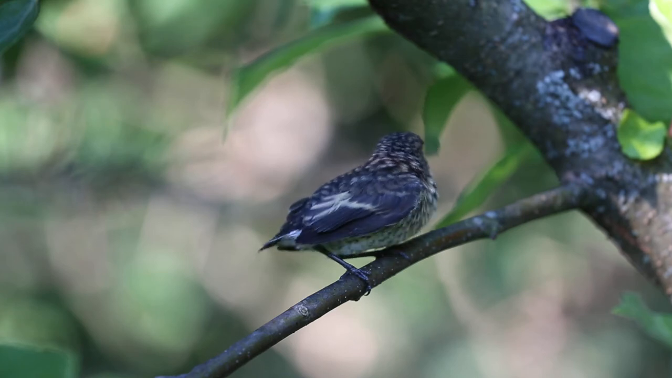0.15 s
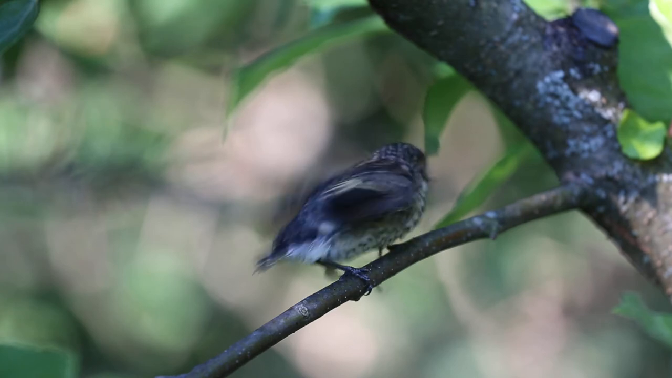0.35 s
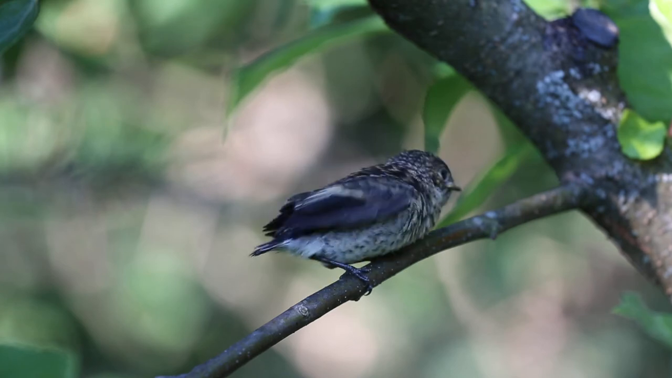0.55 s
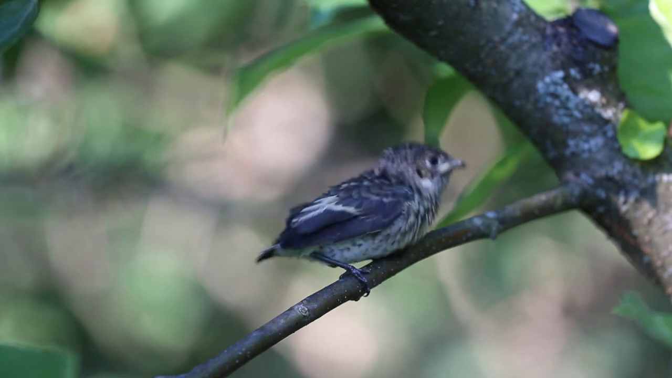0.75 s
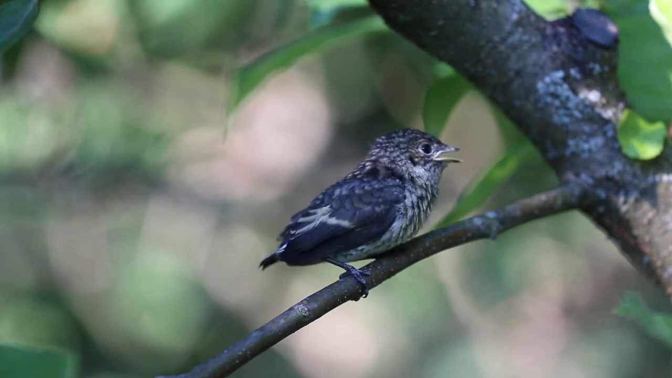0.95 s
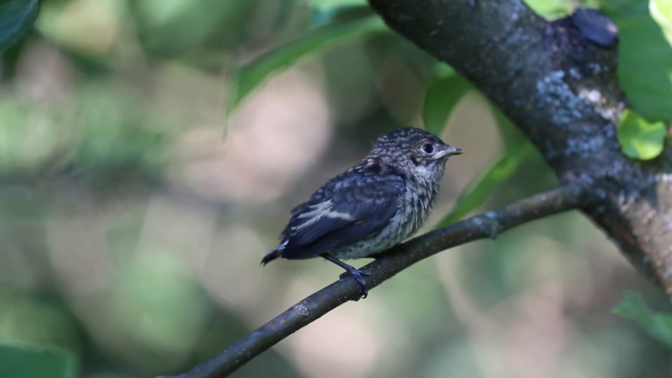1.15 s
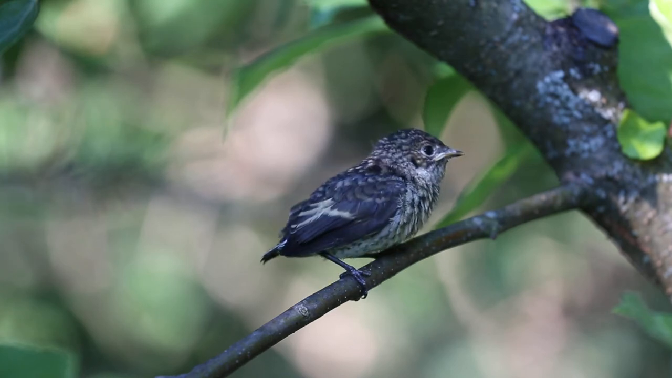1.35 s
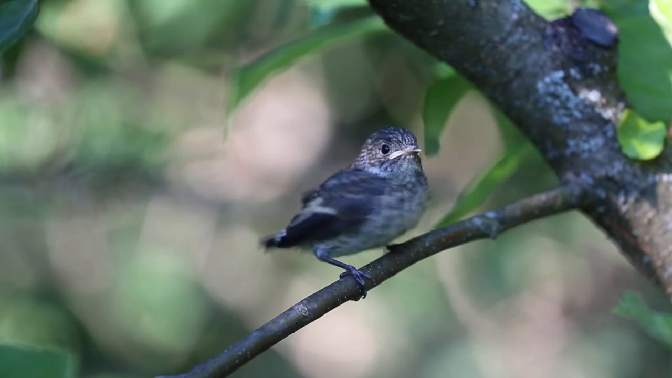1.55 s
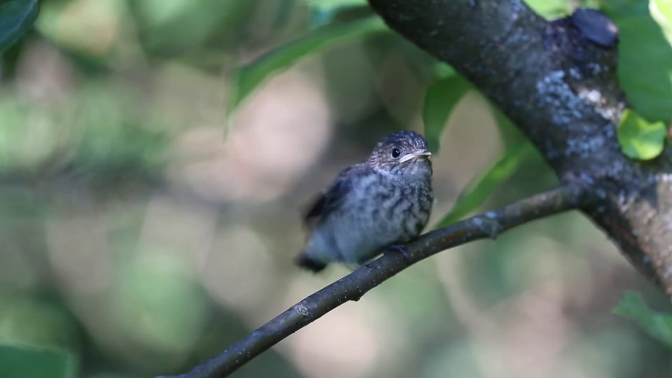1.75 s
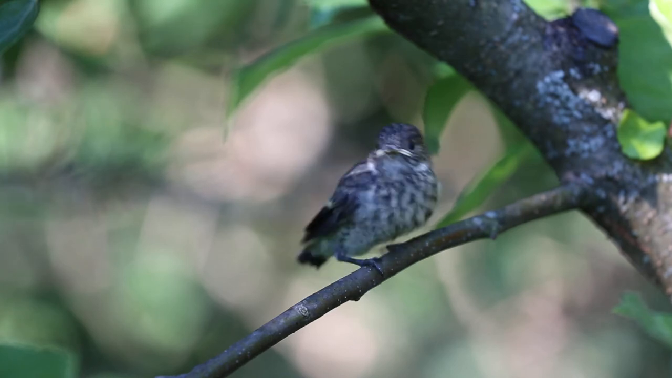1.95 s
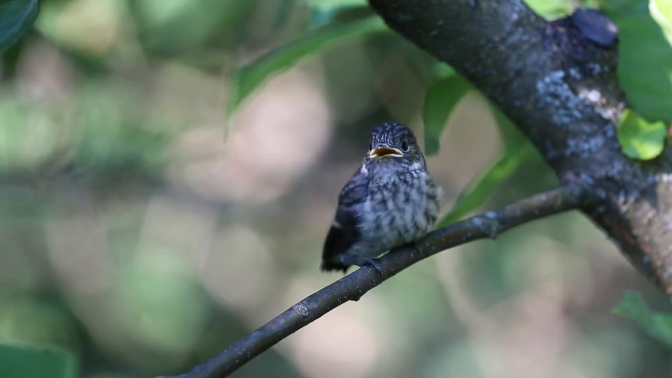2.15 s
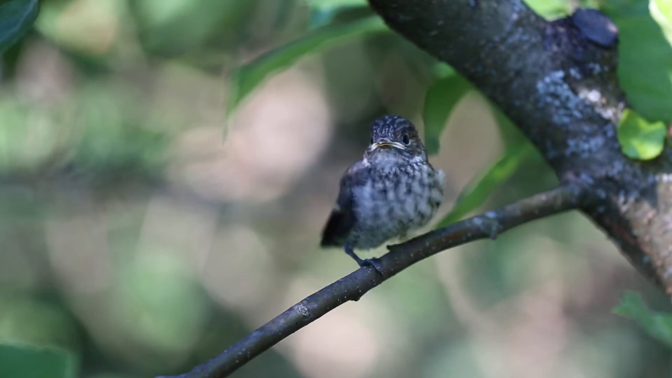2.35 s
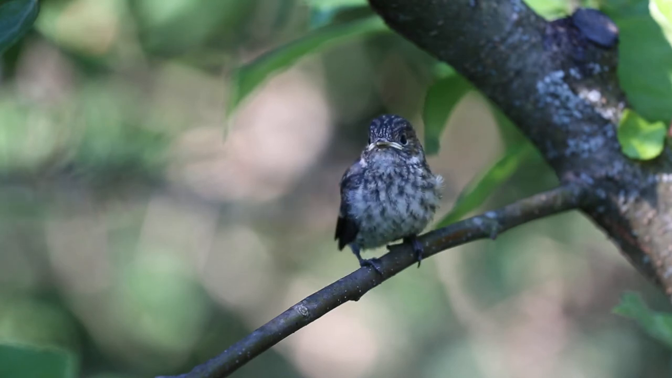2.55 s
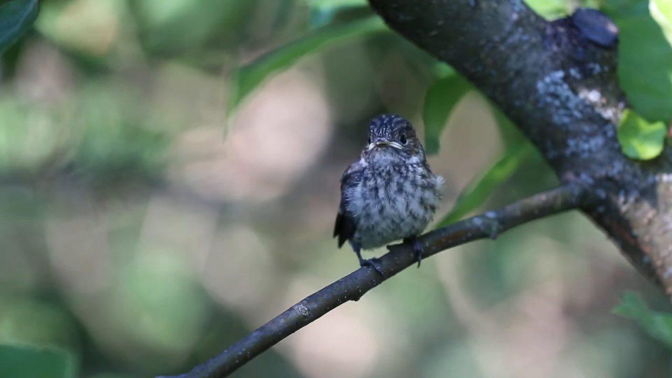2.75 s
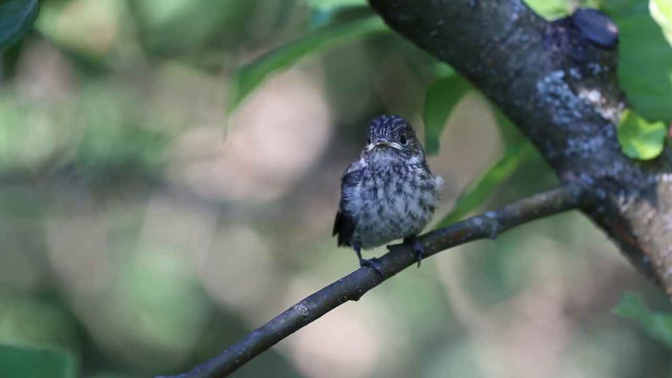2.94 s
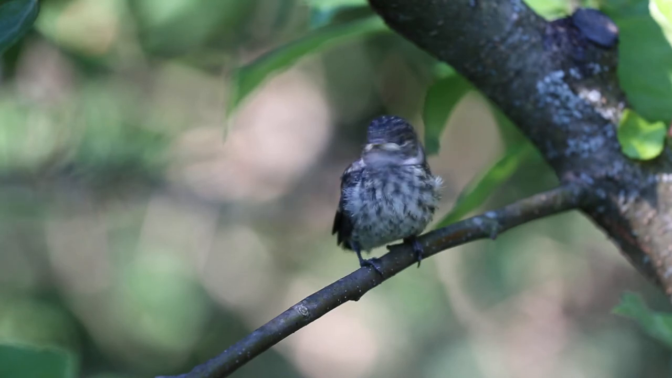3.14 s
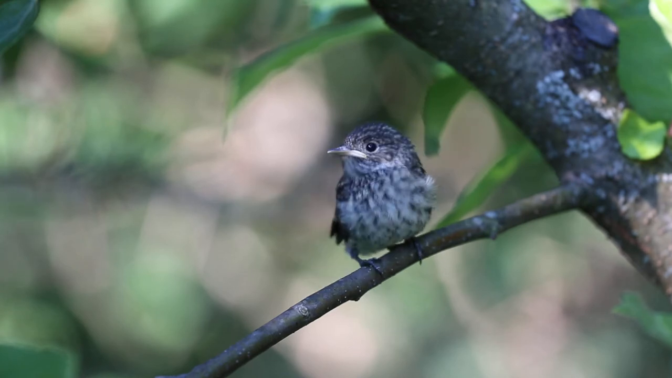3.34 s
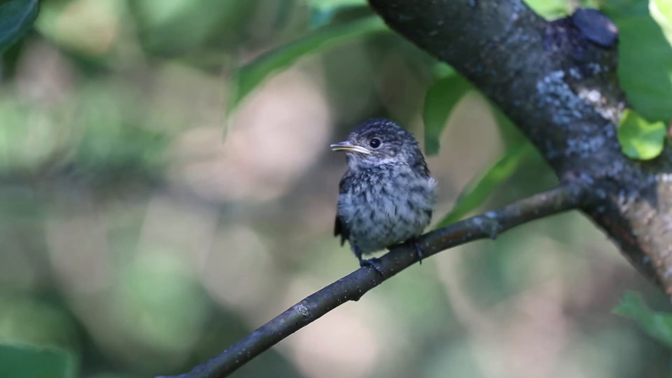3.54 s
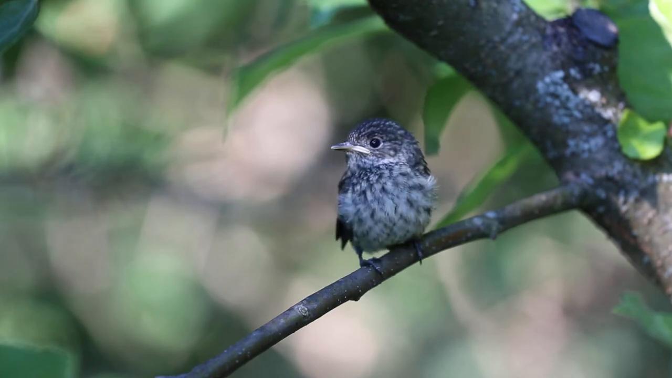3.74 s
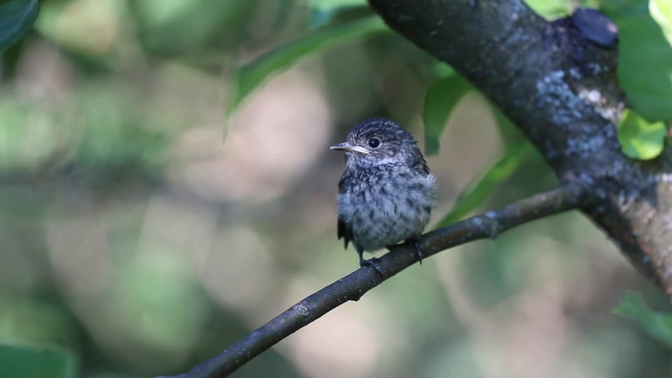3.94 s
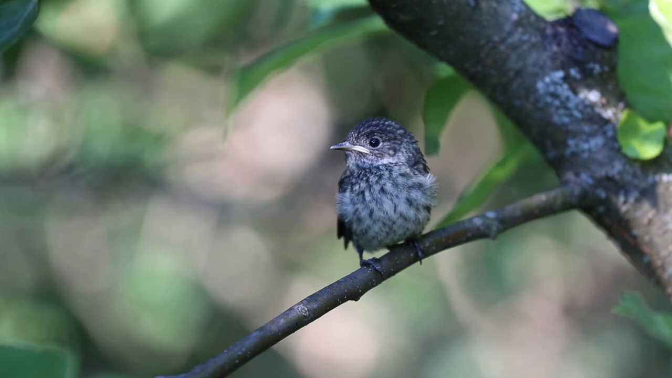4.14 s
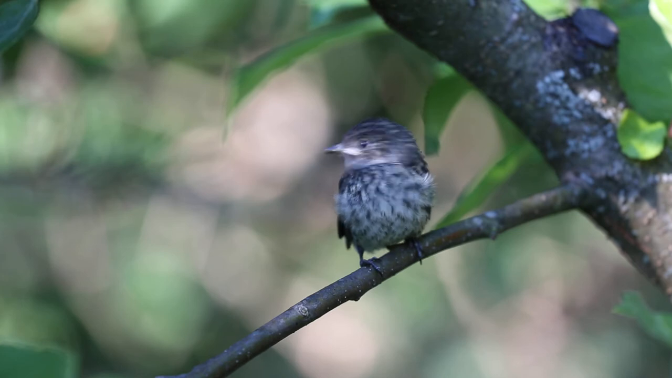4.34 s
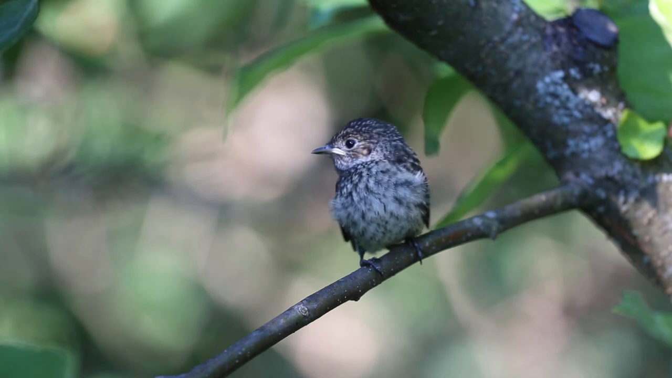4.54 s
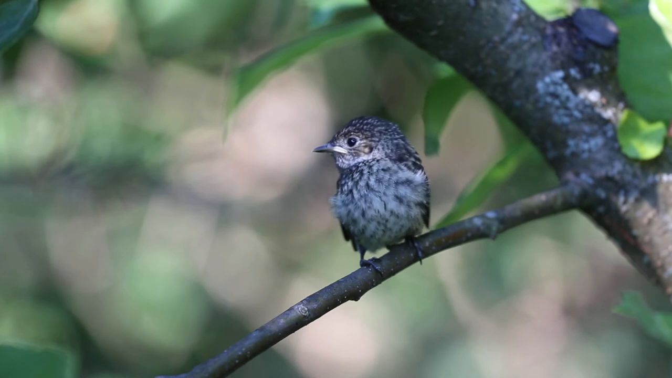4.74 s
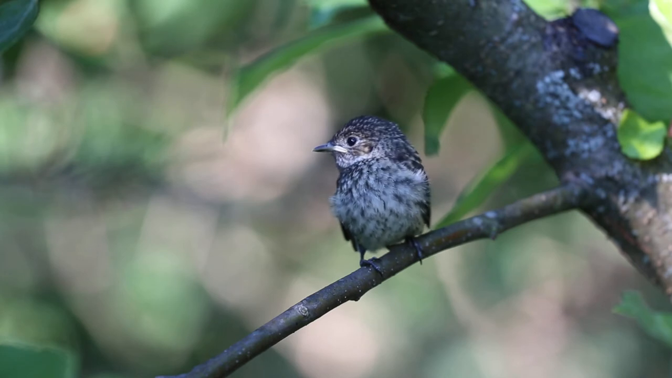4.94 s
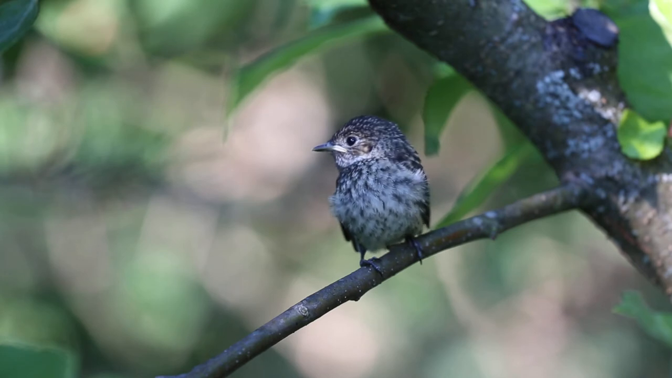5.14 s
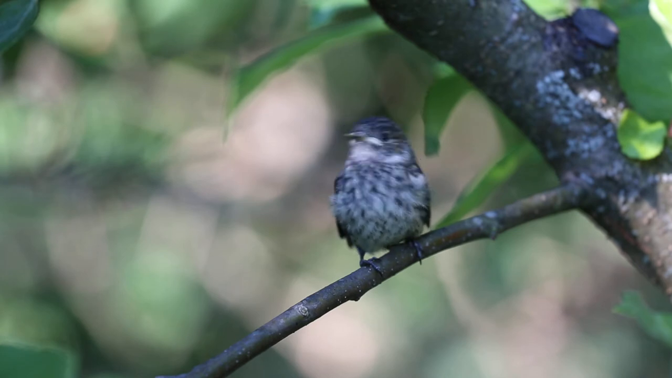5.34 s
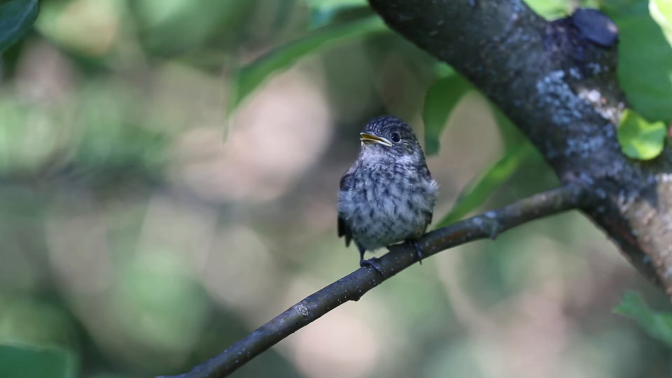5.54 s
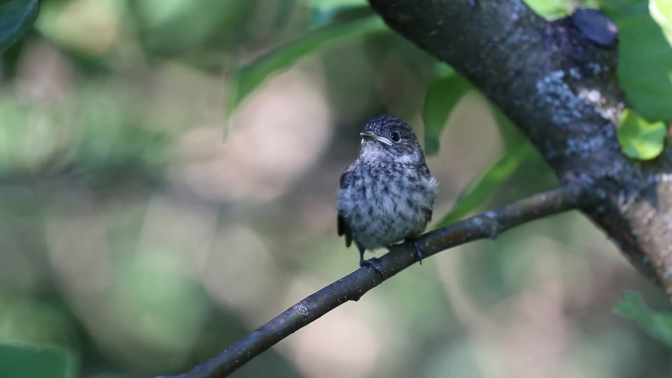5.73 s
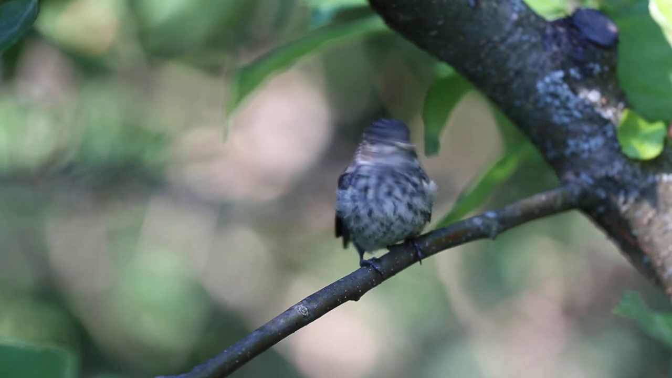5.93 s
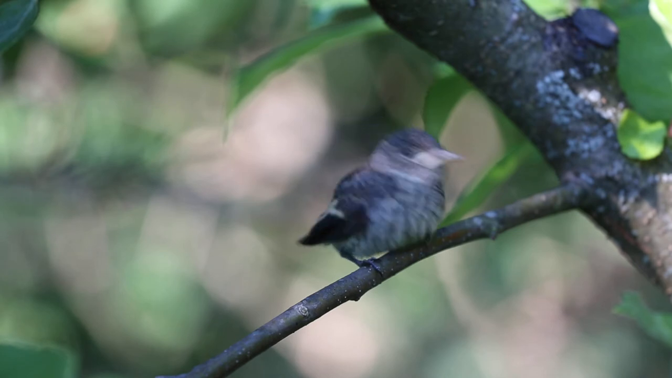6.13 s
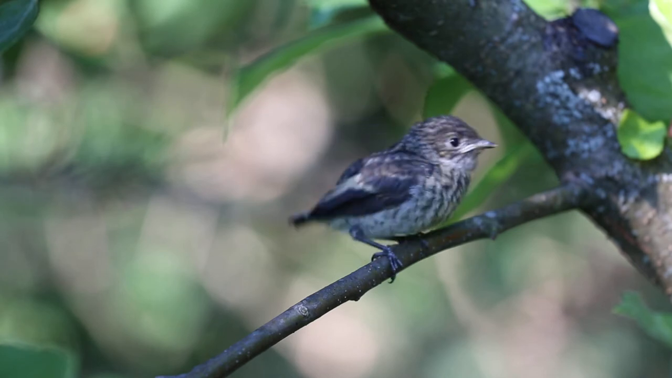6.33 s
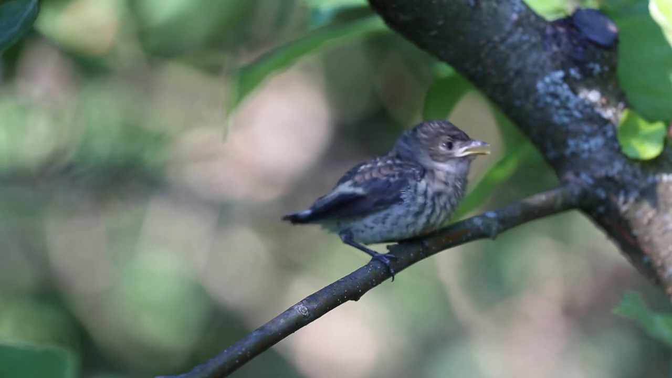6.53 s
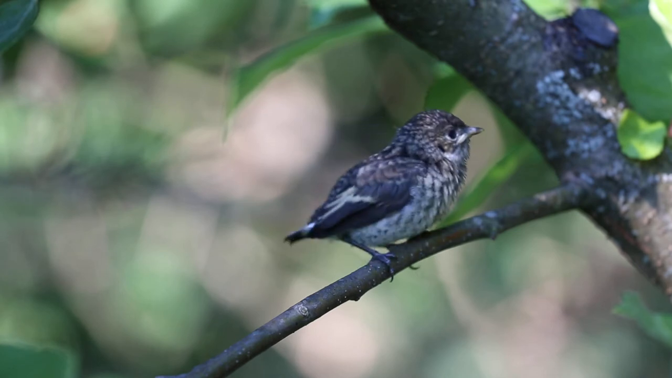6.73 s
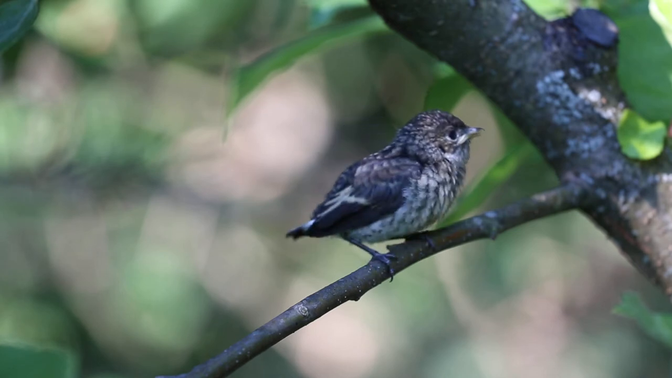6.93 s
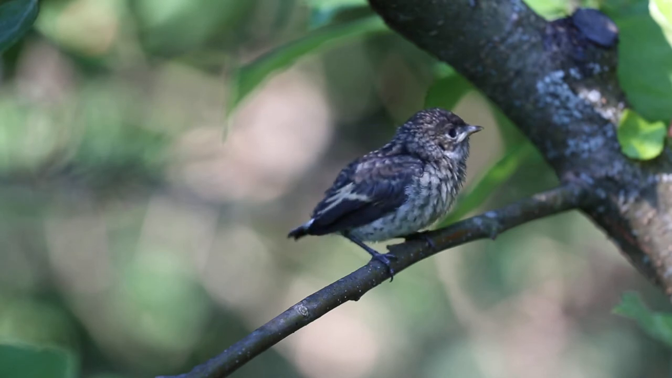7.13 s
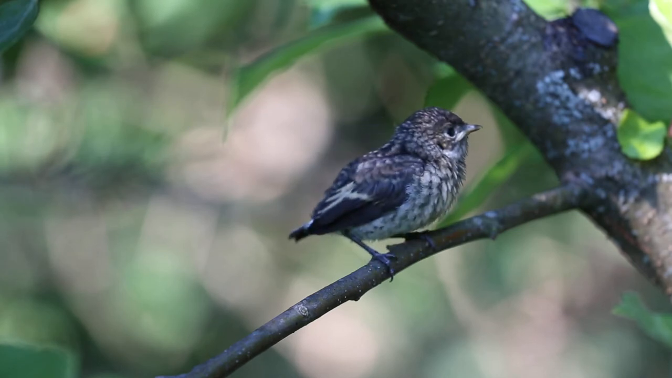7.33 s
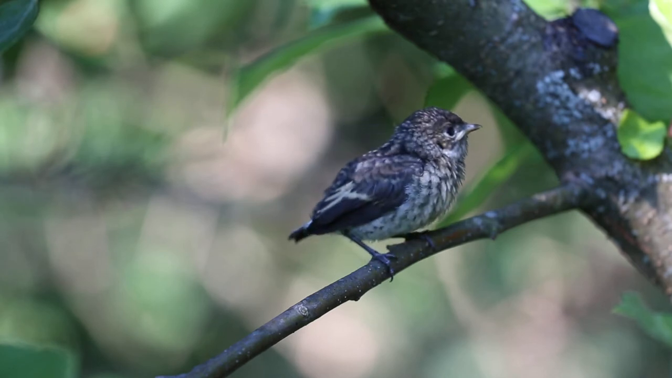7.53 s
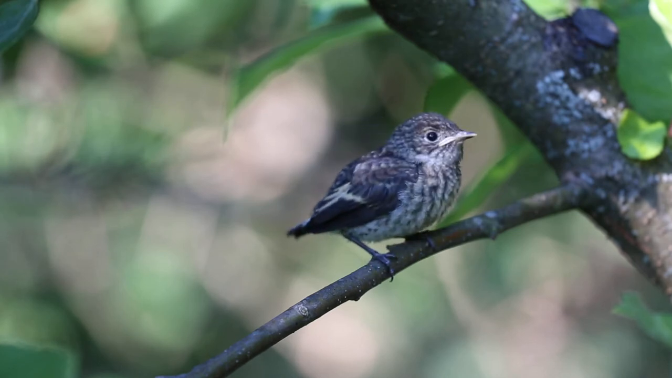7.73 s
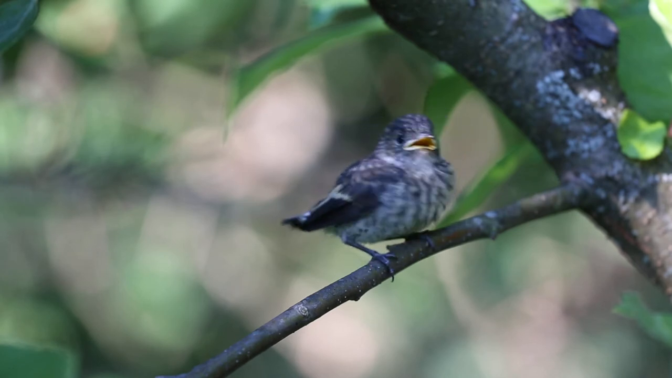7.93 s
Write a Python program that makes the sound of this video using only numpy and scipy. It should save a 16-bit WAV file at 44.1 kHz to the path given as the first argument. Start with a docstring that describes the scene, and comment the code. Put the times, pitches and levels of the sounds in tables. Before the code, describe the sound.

Thin, shrill cheeps from a nearby young songbird repeat every second or two, with distant birds and softly rushing air.

```python
"""In a wood, a young bird on a branch begs six times. Each call is two high, warbling voices,
one from each side of its voice box (the syrinx). Its wings flick just before the last call.
Other birds sing, chip and call further off, and once a distant piece of metal scrapes and rings.
Leaves and trunks send back echoes. Under it all lie a soft rush of air and a faint hum."""
import sys
import numpy as np
from scipy import signal
from scipy.fft import rfft, irfft, next_fast_len
from scipy.io import wavfile

SR = 44100
rng = np.random.default_rng(int(sys.argv[2]) if len(sys.argv) > 2 else 0)


def master(y):
    """Save y as 16-bit WAV."""
    cut = np.clip(np.atleast_2d(y).T, -1, 1)
    pcm = np.round(cut * 32767)  # scale
    wavfile.write(sys.argv[1], SR, pcm.astype(np.int16))


N = 355446
TIME = np.arange(N) / SR

# tone of the rushing air: f/Hz, relative level/dB
AIR_TONE = [(15, -47), (25, -11), (99, -6), (129, -9), (193, -2), (274, -7.5), (389, -1.5), (433, -6),
            (871, -8), (2420, -15.5), (3000, -15.5), (4500, -16), (5280, -17.5), (8580, -20),
            (15500, -26.5)]
# gusts of breeze: peak t/s, half length/s, rise/dB
BREEZE_GUSTS = [(1.3, 0.43, 2.2), (5.908, 0.26, 4.5), (6.76, 0.096, 4.5)]
# how the hum sinks and grows: t/s, relative level/dB
HUM_LEVELS = [(0, -67), (1, -74), (3.8, -71), (5.0, -62), (8.05, -59)]
# far bird calls, blurred by the trees, and at 4.26 s a low blurred echo of the song: t/s, length/s, f/Hz,
# width/Hz, level/dB
DISTANT_CALLS = [(.0, 0.26, 4160, 220, -57), (.11, 0.22, 8250, 700, -56), (4.06, 0.27, 7480, 650, -51.5),
                 (4.26, 0.12, 2280, 354, -57), (4.36, 0.2, 8900, 550, -55), (5.735, .058, 4270, 170, -49),
                 (5.74, 0.32, 4255, 131, -60), (6.78, 0.52, 3730, 400, -59.5),
                 (7.05, .99, 3450, 1350, -55.5), (7.45, 0.99, 4780, 810, -52.5),
                 (7.82, 0.29, 3700, 970, -49)]
# the songbird's clearest notes: t/s, length/s, slide name, f/Hz near the note's top, level/dB
SONG_NOTES = [(0.153, 0.049, "dive", 3160, -54), (1.677, 0.014, "rise", 6300, -51),
              (1.726, 0.047, "arch", 5800, -47), (1.859, 0.025, "flat", 5600, -49.5),
              (1.96, 0.041, "arch", 5800, -46), (2.053, 0.058, "droop", 4620, -51),
              (2.242, 0.035, "rise", 5650, -45.5), (2.34, 0.038, "rise", 5800, -44),
              (2.425, .014, "flat", 5600, -41), (2.509, 0.064, "droop", 4450, -51),
              (2.633, 0.037, "rise", 5840, -42), (2.666, .016, "fall", 5700, -44),
              (2.752, 0.065, "droop", 4720, -52.5), (2.875, 0.04, "flat", 5750, -47.5),
              (2.938, .024, "flat", 6450, -50), (3.003, .036, "fall", 3900, -54.5),
              (3.056, .018, "droop", 6220, -52), (3.08, 0.024, "fall", 5320, -47),
              (3.133, .038, "arch", 5750, -46.5), (3.169, .025, "fall", 4200, -50),
              (3.219, 0.0283, "fall", 3560, -50), (3.24, 0.072, "flat", 4250, -53.5),
              (3.37, .049, "rise", 3900, -55), (3.442, 0.035, "rise", 3200, -53.5),
              (3.573, 0.045, "arch", 3820, -51.5), (3.681, 0.016, "flat", 4300, -47.5),
              (3.772, 0.04, "arch", 3580, -51)]
# pitch slides by name: start, middle and end as shares of the note's f
SLIDES = {"rise": (.79, .93, 1), "arch": (.83, 0.97, .77), "fall": (0.98, .88, 0.787),
          "droop": (0.97, 0.94, .82), "flat": (0.96, 1, 0.94), "dive": (1, .83, 0.682)}
# a bird that chips in pairs: t/s, level/dB
CHIP_PAIRS = [(0.343, -59), (.777, -60.5), (4.525, -60), (4.757, -57), (5.183, -57), (6.508, -57.5),
              (6.989, -58), (7.457, -57.5), (7.857, -58)]
# overtones of a chip: multiple of the pitch, relative level/dB
CHIP_OVERTONES = [(2, 5), (3, 4.5), (4, -1.5), (5, -9.5)]
# begging calls, before the throat shapes them: t/s, length/s, starting warble length/s,
# slowing/(s per warble squared), low voice f/Hz, high voice f/Hz, low level/dB, high level/dB,
# low voice's peak as a share of the length, octave gain/dB, gain into the wood/dB
BEGGING_CALLS = [(0.9112, 0.18, 0.017, .0015, 6737, 7865, -14.5, -19, 0.4, -32, 1),
                 (2.152, 0.19, 0.016, .0015, 6680, 7906, -13.5, -16, 0.26, -34.5, -1.5),
                 (3.5713, 0.17, .0172, .0012, 6710, 7900, -21, -21.5, 0.31, -25, -0.5),
                 (5.432, 0.19, .0203, .0009, 6870, 7820, -18, -17, 0.38, -29.5, -1),
                 (6.5492, 0.17, .0182, 0.00141, 6815, 7830, -17, -20, 0.16, -29, 3),
                 (7.8817, 0.17, 0.019, 0.0015, 6790, 7685, -11.5, -13, 0.32, -34.5, 2.5)]
# pitches that the throat and open bill boost or weaken: f/Hz, gain/dB
THROAT_TONE = [(5000, -5), (6150, -7.5), (6500, -1.5), (6900, 2), (7200, -2), (7550, -3), (7950, 0.5),
               (8300, -4.5), (9000, -2.5), (13500, 0)]
# the metal scrapes, then clashes: t/s, length/s, f/Hz, width/Hz, level/dB
METAL_SCRAPES = [(1.19, 0.25, 5400, 170, -51.5), (1.2, 0.29, 7830, 170, -55), (1.22, .1, 4580, 87, -55),
                 (1.19, 0.19, 10600, 430, -63), (1.19, .2, 15150, 300, -65), (1.18, .16, 880, 30, -58),
                 (1.335, 0.3, 1430, 310, -53), (1.335, 0.11, 2580, 4900, -46.5)]
# the metal's ringing tones: f/Hz, level/dB, time to fade 60 dB/s, swell time/s
METAL_TONES = [(880, -56, .7, .03), (1390, -54, .6, .03), (1475, -50, .9, .03), (1841, -55, 1.2, .04),
               (2051, -52, .9, .03), (2110, -55, .7, .03), (2815, -51, .7, .06), (2864, -52, .7, .06),
               (3381, -49, .6, .04), (3731, -39.5, 1.1, .045), (4382, -47.5, .6, .05),
               (5662, -44, 1.0, .06), (5894, -41, .4, .05), (5918, -34, .75, .06), (7051, -38, 1.1, .11),
               (8176, -38.5, .9, .06), (10450, -54, .5, .1), (10590, -54, .7, .1)]
# runs of soft notes that end the song: start t/s, end t/s
SOFT_RUNS = [(3.05, 3.33), (3.39, 3.5), (3.58, 3.7), (3.77, 3.87), (4.06, 4.26)]
# names of the slides those notes pick from
SOFT_SLIDES = ["fall", "dive", "arch"]


def from_db(db):
    """Turn decibels into a number to multiply by."""
    return 10 ** (np.asarray(db) / 20)


def rms_one(x):
    """Scale a sound to an average power of 1."""
    return x / np.sqrt(np.mean(x ** 2) + 1e-20)


def add(out, s, sound):
    """Mix a sound in, starting at s seconds."""
    at = max(int(s * SR), 0)
    out[at:at + len(sound)] += sound[:max(N - at, 0)]


def drift(t, rate):
    """A random wander of size about 1 that turns `rate` times per unit of t."""
    points = rng.standard_normal(4096)
    return np.interp(t * rate, np.arange(len(points)), points)


def fade(t, length, rise, fall):
    """A smooth fade in and out; all four values share one unit."""
    fade_in = np.sin(np.pi / 2 * np.clip(t / rise, 0, 1))
    return fade_in * np.sin(np.pi / 2 * np.clip((length - t) / fall, 0, 1))


def phase_of(hz):
    """The growing angle whose sine is a gliding tone."""
    return 2 * np.pi * np.cumsum(hz) / SR


def noise_band(hz, width, size):
    """Noise around one pitch, with a power of 1."""
    edges = np.clip([hz - width / 2, hz + width / 2], 10, .45 * SR)
    band = signal.butter(2, edges, "band", fs=SR, output="sos")
    return rms_one(signal.sosfilt(band, rng.standard_normal(size)))


def colour(x, points):
    """Change a sound's tone along a curve of f/Hz, gain/dB points."""
    hz, db = np.transpose(points)
    size = next_fast_len(N + SR)
    bins = np.maximum(np.arange(size // 2 + 1) * SR / size, 1)
    return irfft(rfft(x, size) * from_db(np.interp(np.log(bins), np.log(hz), db)), size)[:N]


def echoes(x, fade_s, db, delay_s):
    """Echoes from countless leaves and trunks, fading 60 dB in fade_s."""
    t = np.arange(SR) / SR
    bounces = rng.standard_normal(SR) * from_db(-60 * t / fade_s) * (t > delay_s)
    return from_db(db) * signal.fftconvolve(x, bounces / np.linalg.norm(bounces))[:N]


def breeze(rush_db=-51, calm_db=-1.06):
    """A steady rush of air whose middle pitches swell with each gust."""
    rush = from_db(rush_db) * rms_one(colour(rng.standard_normal(N), AIR_TONE))
    middle = signal.sosfilt(signal.butter(1, [450, 1500], "band", fs=SR, output="sos"), rush)
    middle_db = calm_db + sum(db * np.exp(-((TIME - s) / half) ** 2) for s, half, db in BREEZE_GUSTS)
    return rush + (from_db(middle_db) - 1) * middle


def hum(hz=104.5, waver_hz=1.97, gain_db=-3.5, drone_db=-66):
    """A far, wavering hum with a faint, noisy drone above it."""
    level = from_db(np.interp(TIME, *np.transpose(HUM_LEVELS)) + gain_db)
    tone = rms_one(np.sin(phase_of(hz + waver_hz * drift(TIME, 4.4))))
    return level * tone + from_db(drone_db) * noise_band(hz=360, width=80, size=N)


def blurred_sounds(rows, rise, fall):
    """Far sounds arrive by so many paths that each becomes a swell of noise."""
    out = np.zeros(N)
    for s, length, hz, width, db in rows:
        progress = np.linspace(0, 1, int(length * SR))
        noise = noise_band(hz, width, size=2 * SR)[:len(progress)]
        add(out, s, from_db(db) * fade(progress, 1, rise, fall) * noise)
    return out


def songbird(notes, quaver_hz=30, flutter_db=4.0):
    """Thin whistled notes, each sliding along a slightly unsteady curve."""
    out = np.zeros(N)
    for s, length, slide, hz, db in notes:
        progress = np.linspace(0, 1, int(length * SR))
        pitch = hz * np.polyval(np.polyfit([0, .5, 1], SLIDES[slide], 2), progress)
        tone = np.sin(phase_of(pitch + quaver_hz * drift(progress * length, 430)))
        level = from_db(db + flutter_db * drift(progress * length, 227))
        add(out, s, level * fade(progress, 1, rise=.18, fall=.25) * tone)
    return out


def chipping_bird(length_s=0.0256, gap_s=.052, start_hz=1610, end_hz=1270, uneven_db=3.0):
    """Pairs of quick falling chips; only the overtones of the pitch sound."""
    out, progress = np.zeros(N), np.linspace(0, 1, int(length_s * SR))
    pitch = start_hz + (end_hz - start_hz) * progress
    for s, first_db in CHIP_PAIRS:
        for start, db in ((s, first_db), (s + gap_s, first_db - 1)):
            phase = phase_of(pitch * (1 + .018 * rng.standard_normal()))
            chip = sum(from_db(overtone_db + uneven_db * drift(progress, 5.9)) * np.sin(k * phase)
                       for k, overtone_db in CHIP_OVERTONES)
            add(out, start, from_db(db) * fade(progress, 1, rise=.18, fall=.25) * chip)
    return out


def voice_bend(t, length, warbles, swoop, sag, drop):
    """A pitch multiplier: swoop down, sag with each warble, drop as the breath runs out."""
    return 1 + swoop * np.exp(-t / .005) - sag * (warbles - 3.5) - drop * np.exp((t - length) / .014)


def young_bird(warble_hz=386, jitter_hz=65, flutter_db=2.0, effort_db=27):
    """Two membranes warble in step, ever slower. Returns the direct sound and that sent into the wood."""
    direct, into_wood = np.zeros((2, N))
    for s, length, first, slowing, low_hz, high_hz, low_db, high_db, peak, octave_db, wood_db \
            in BEGGING_CALLS:
        t = np.arange(int(length * SR)) / SR
        warbles = (np.sqrt(first ** 2 + 4 * slowing * t) - first) / (2 * slowing)   # count so far
        turn = 2 * np.pi * warbles
        depth = warble_hz * (1 - .5 * np.exp(-t / .0082)) * np.exp(-t / .2)   # opens fast, then narrows
        # each warble is lopsided, and no two are equally deep
        swing = depth * np.cos(turn - .45 * (1 - np.cos(turn))) * (1 + .17 * drift(warbles, .92))
        low_pitch = low_hz * voice_bend(t, length, warbles, swoop=.11, sag=.0098, drop=.029)
        high_pitch = high_hz * voice_bend(t, length, warbles, swoop=.042, sag=.015, drop=.023)
        low_phase = phase_of(low_pitch + swing + jitter_hz * drift(t, 700.4))
        high_phase = phase_of(high_pitch + 1.215 * swing + jitter_hz * drift(t, 700))
        # effort swells and ebbs once a call; the high voice peaks later
        past_peak = t / length - peak
        low_arch_db = low_db - effort_db * past_peak ** 2
        high_arch_db = high_db - effort_db * (past_peak - .11) ** 2
        # the top of each warble is louder, mainly in the low voice
        low = from_db(low_arch_db + 3 * np.cos(turn - .6) + flutter_db * drift(t, 520))
        high = from_db(high_arch_db + .1 * np.cos(turn) + flutter_db * drift(t, 520))
        voices = low * np.sin(low_phase) + high * np.sin(high_phase)
        # the voices mix in the throat, making octaves, a sum tone and weak side tones
        both = np.sqrt(low * high)
        octaves = .88 * low * np.sin(2 * low_phase) + .4 * high * np.sin(2 * high_phase)
        sum_tone = .706 * both * np.sin(low_phase + high_phase)
        sides = both * (np.sin(2 * high_phase - low_phase) + 1.63 * np.sin(2 * low_phase - high_phase))
        bill_opening = fade(t, length, rise=.013, fall=.011) ** 2
        call = (voices + from_db(octave_db) * (octaves + sum_tone) + from_db(-33) * sides) * bill_opening
        add(direct, s, call)
        add(into_wood, s, from_db(wood_db) * call)   # depends on where the bill points
    return colour(direct, THROAT_TONE), colour(into_wood, THROAT_TONE)


def ringing_metal(start_s=1.345, free_s=0.29, damped_fade_s=0.7, waver_db=4.5):
    """Each tone swells and rings, wavering, then dies faster once the metal is damped."""
    out, t = np.zeros(N), np.arange(SR) / SR
    damping_db = 60 * np.maximum(t - free_s, 0) / damped_fade_s
    for hz, db, fade_s, swell_s in METAL_TONES:
        ring_db = db - 60 * np.maximum(t - swell_s, 0) / fade_s - damping_db
        level = from_db(ring_db + waver_db * drift(t, 34.8)) * np.minimum(t / swell_s, 1) ** 2
        add(out, start_s, level * np.sin(2 * np.pi * hz * t))
    return out


def twitter_notes(note_s=0.045, per_s=26, hz=4190, start_db=-55):
    """Extra rows for the songbird: quick, loosely timed notes that grow lower and fainter."""
    notes = []
    for s in np.concatenate([np.arange(start, end, 1 / per_s) for start, end in SOFT_RUNS]):
        late, higher = rng.uniform(-0.88, 1, 2)
        elapsed = s - SOFT_RUNS[0][0]
        pitch = hz * 2 ** (.38 * higher - .35 * elapsed)
        db = start_db - 2.5 * elapsed
        notes.append((s + .5 * late / per_s, note_s, rng.choice(SOFT_SLIDES), pitch, db))
    return notes


def wing_flick(start_s=7.8, length_s=0.047, hz=132, db=-44):
    """The wings push the air in a soft, low thump."""
    t = TIME - start_s
    return from_db(db) * fade(t, length_s, length_s / 2, length_s / 2) * np.sin(2 * np.pi * hz * t)


def scene():
    """The young bird is close, among leaves; the others sit deep in the wood."""
    begging, into_wood = young_bird()
    begging += echoes(begging, fade_s=0.018, db=-9.5, delay_s=0.0017)   # nearby leaves
    begging += echoes(into_wood, fade_s=0.18, db=-13.5, delay_s=0.0023)
    begging += echoes(into_wood, fade_s=0.59, db=-24.5, delay_s=0.034)
    song, chips = songbird(SONG_NOTES + twitter_notes()), chipping_bird()
    # the wood throws back mostly the lower part of the song
    dull_song = signal.sosfilt(signal.butter(3, 4540, fs=SR, output="sos"), song)
    song += echoes(dull_song, fade_s=0.97, db=0.5, delay_s=0.0073)
    chips += echoes(chips, fade_s=0.6, db=-8.5, delay_s=0.0069)
    metal = ringing_metal() + blurred_sounds(METAL_SCRAPES, rise=0.11, fall=0.53)
    metal += echoes(metal, fade_s=1.26, db=-10, delay_s=0.013)
    far_calls = blurred_sounds(DISTANT_CALLS, rise=0.15, fall=0.66)
    return (breeze() + hum() + far_calls + song + chips + begging + metal + wing_flick())[None]


def record(dry, low_cut_hz=34, ceiling=0.88, high_cut_hz=15750):
    """The microphone loses the deepest bass; loud peaks are rounded; the highest treble is cut."""
    thinned = signal.sosfilt(signal.butter(2, low_cut_hz, "high", fs=SR, output="sos"), dry)
    rounded = thinned / (1 + (thinned / ceiling) ** 8) ** (1 / 8)
    return signal.sosfilt(signal.ellip(12, .1, 90, high_cut_hz, fs=SR, output="sos"), rounded)


dry = scene()
out = record(dry)
master(out)
```